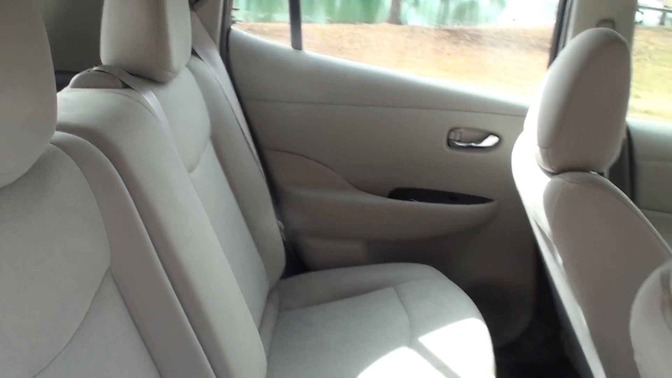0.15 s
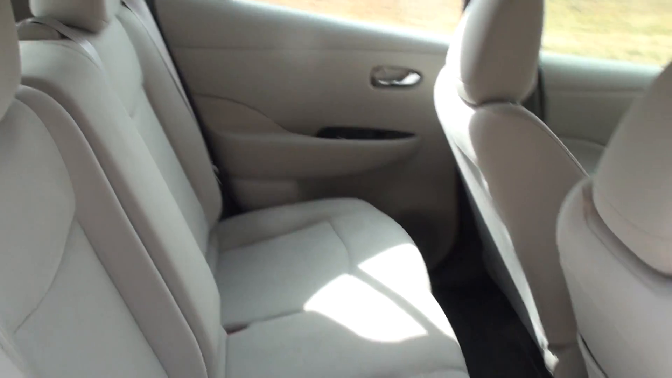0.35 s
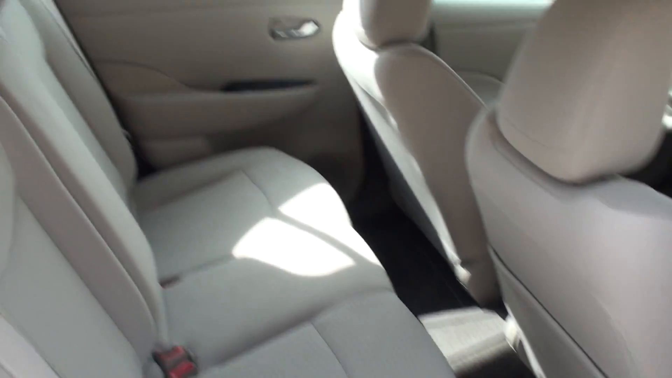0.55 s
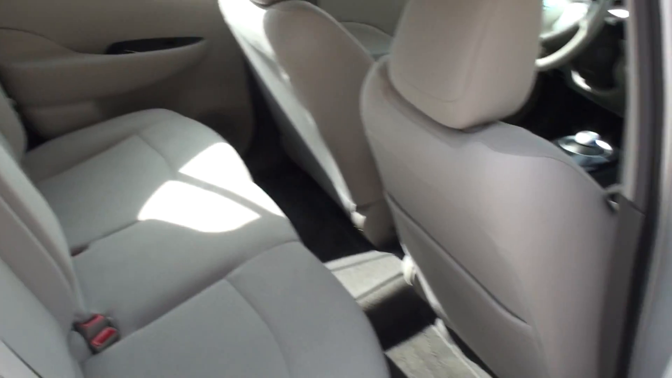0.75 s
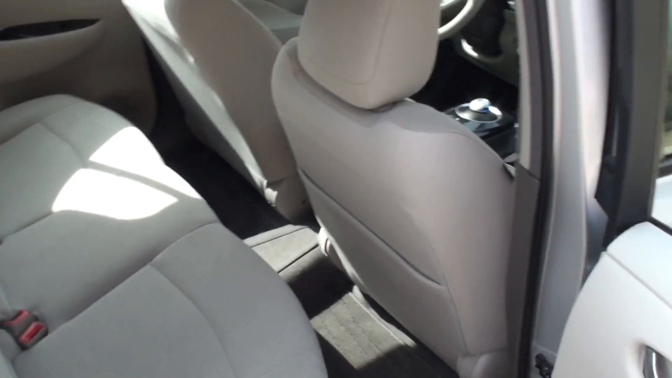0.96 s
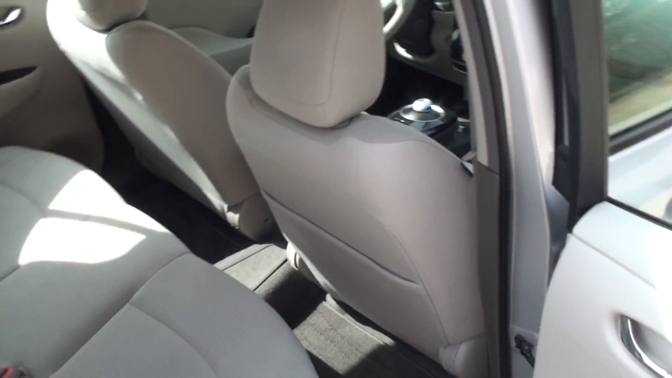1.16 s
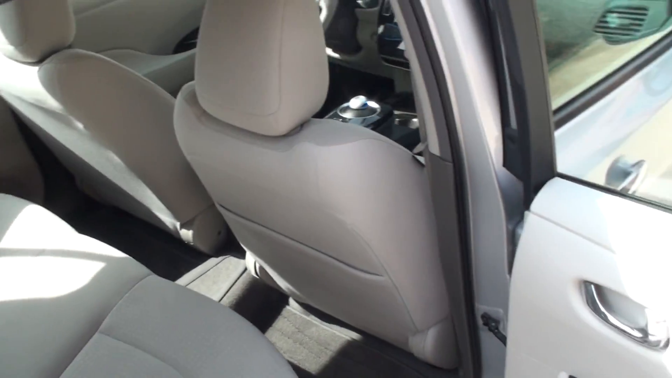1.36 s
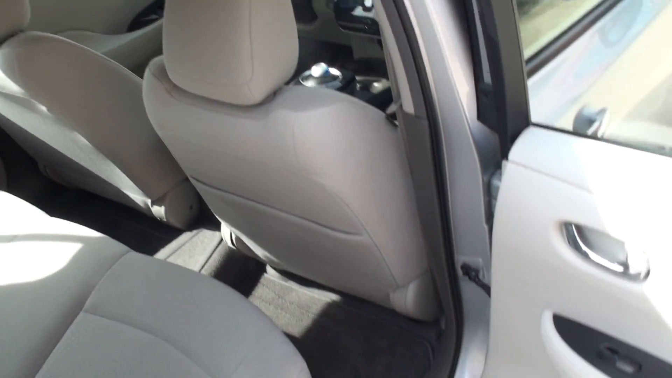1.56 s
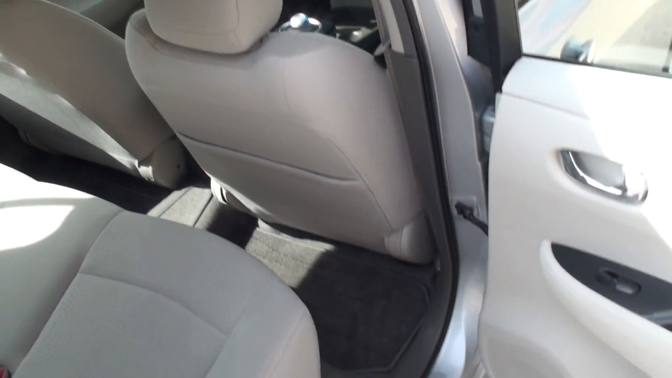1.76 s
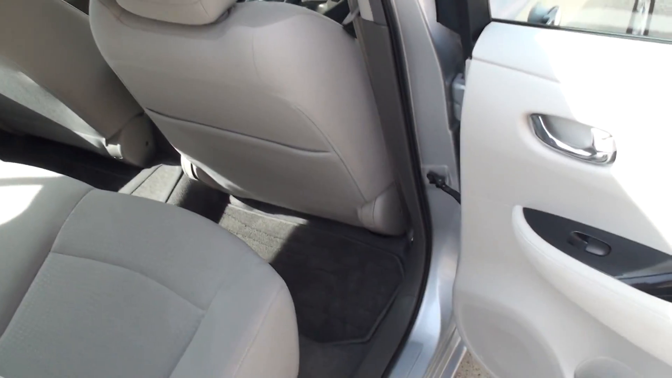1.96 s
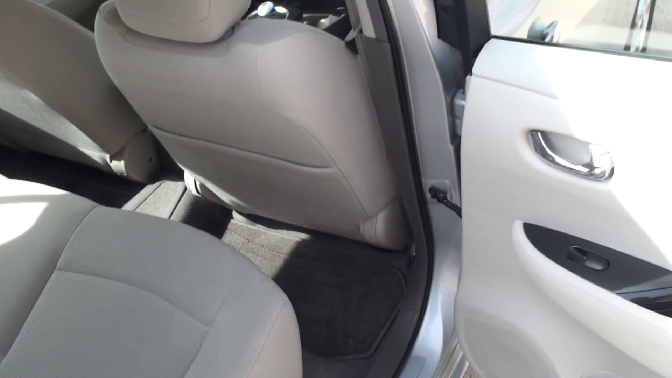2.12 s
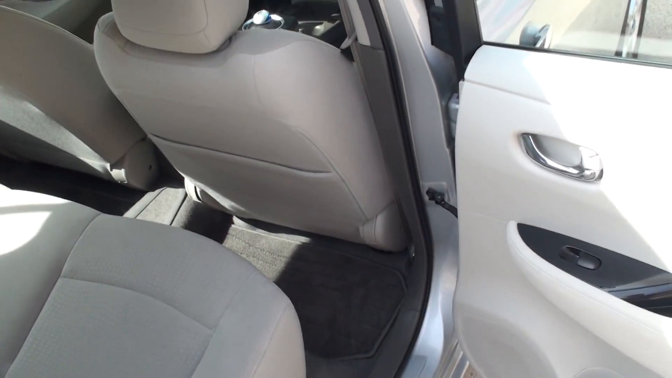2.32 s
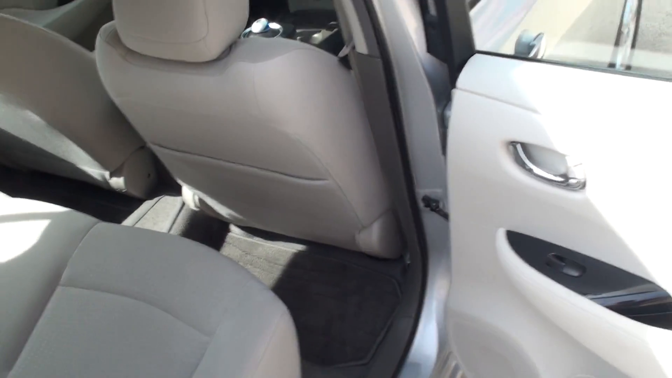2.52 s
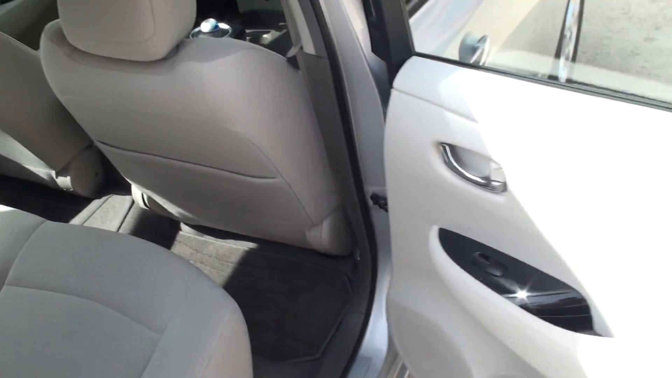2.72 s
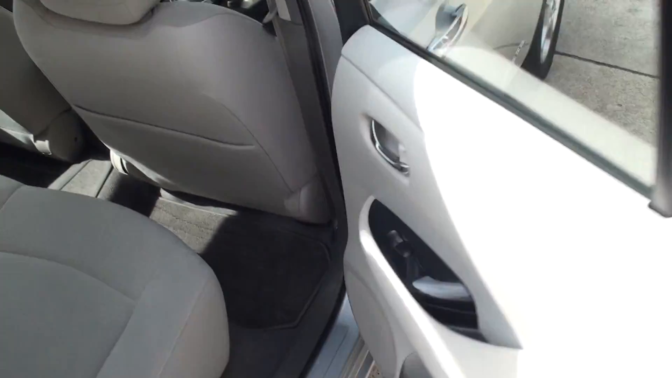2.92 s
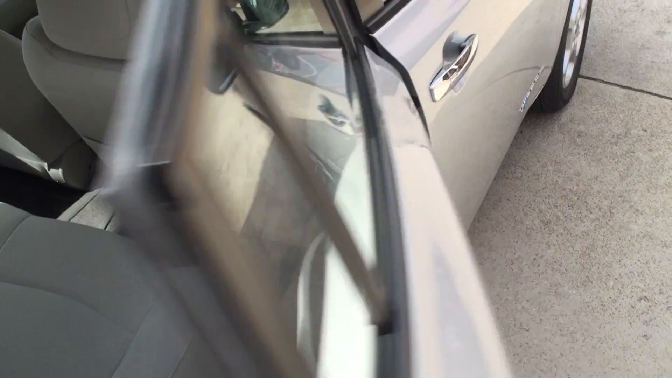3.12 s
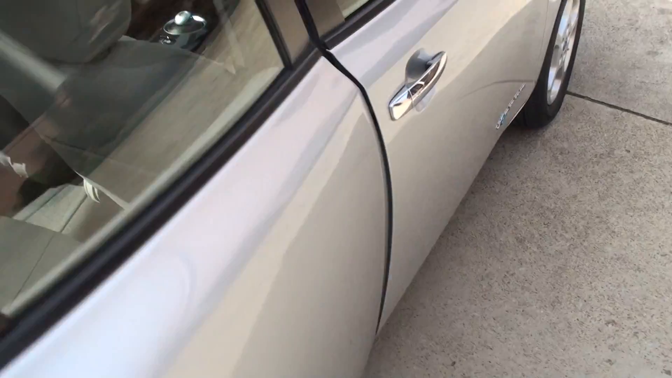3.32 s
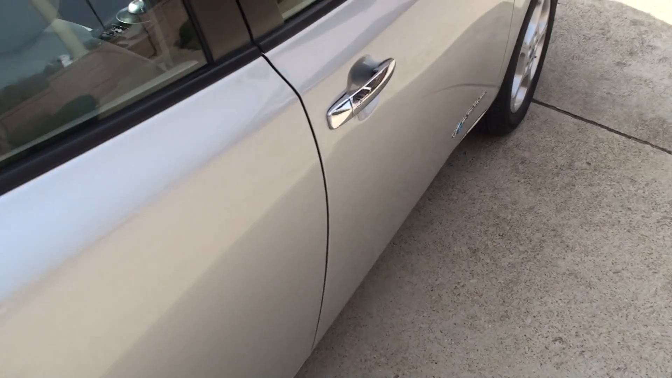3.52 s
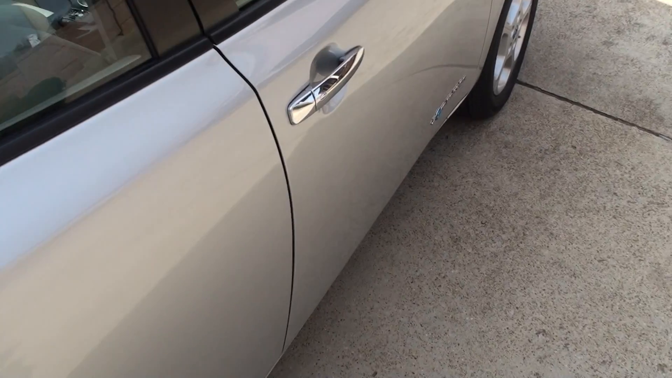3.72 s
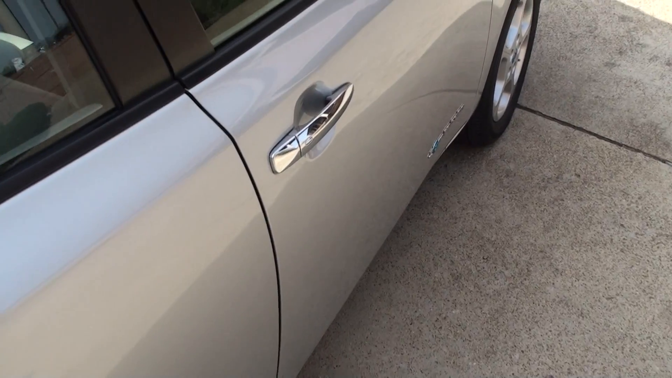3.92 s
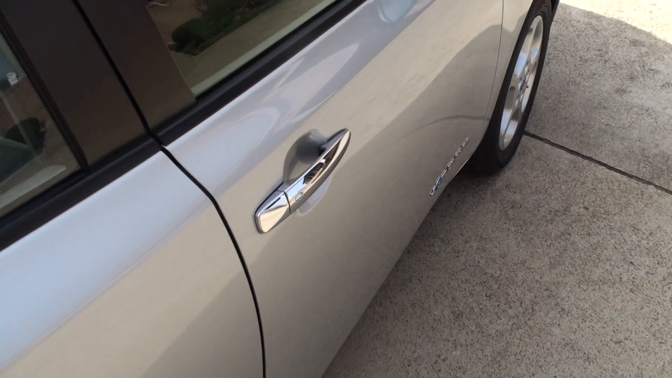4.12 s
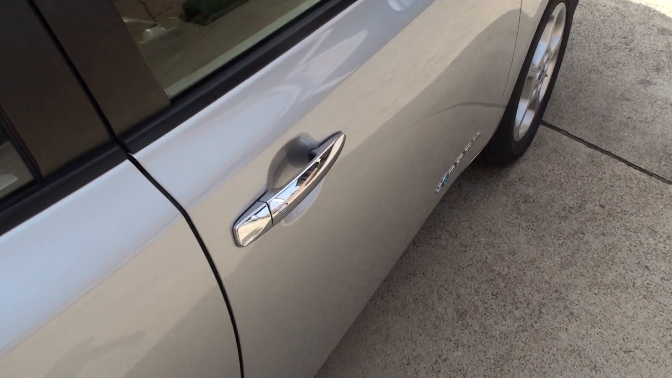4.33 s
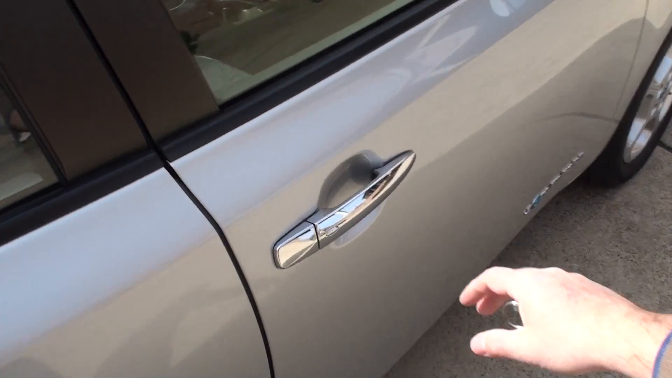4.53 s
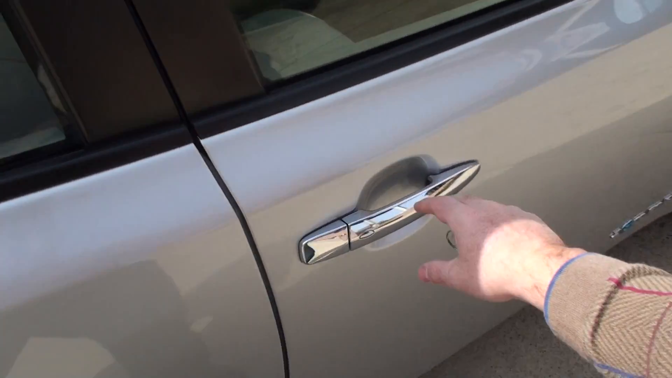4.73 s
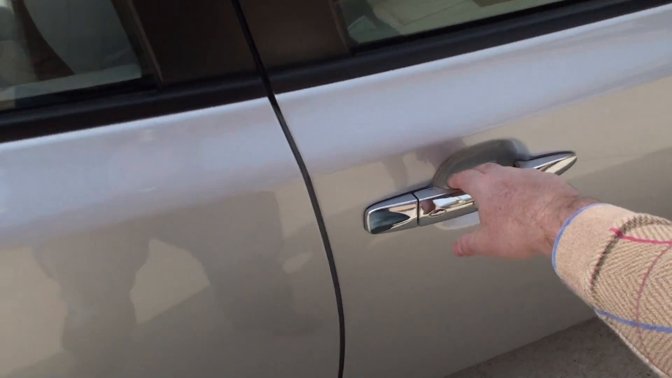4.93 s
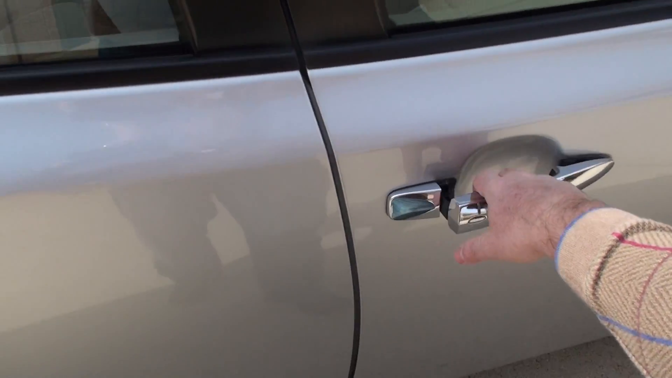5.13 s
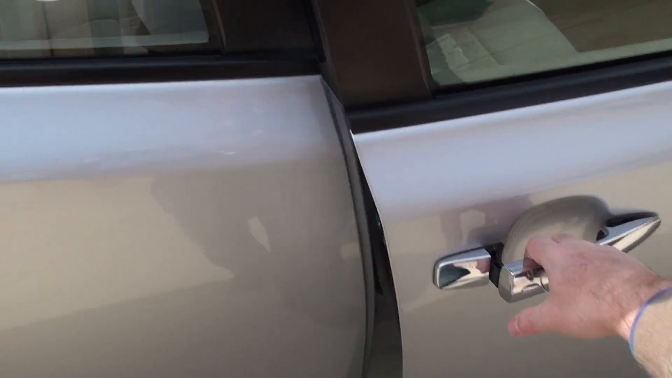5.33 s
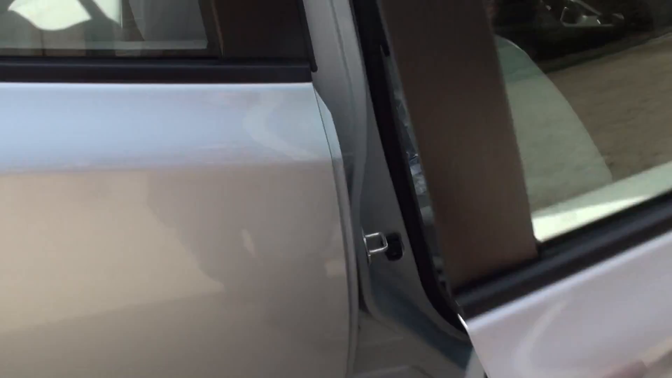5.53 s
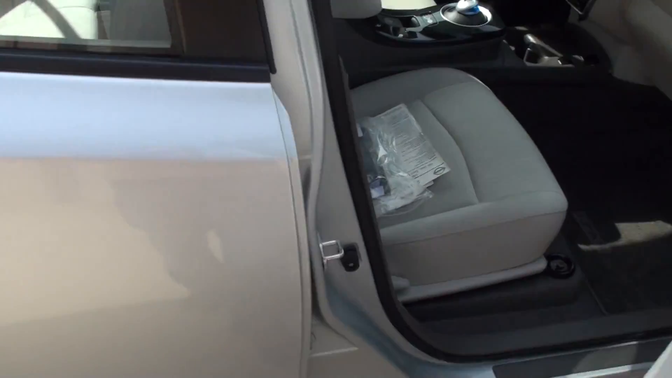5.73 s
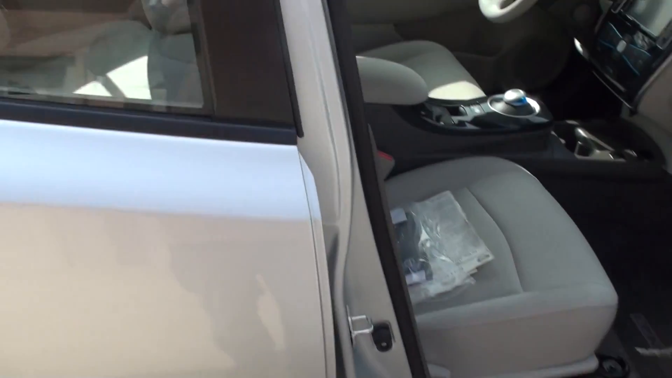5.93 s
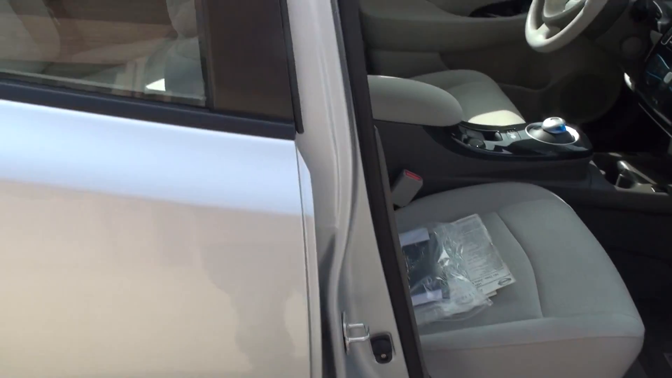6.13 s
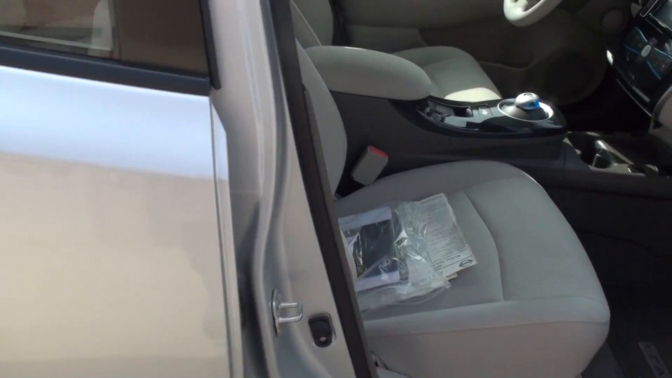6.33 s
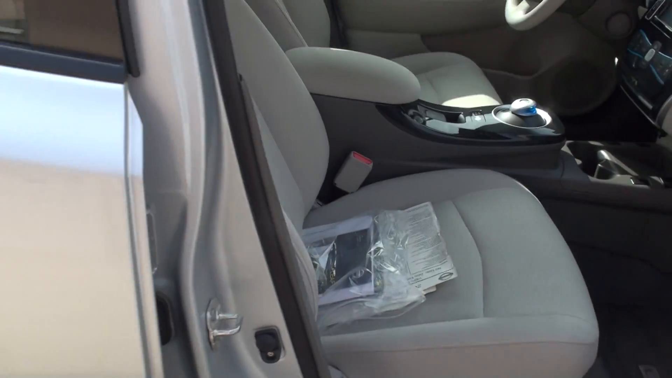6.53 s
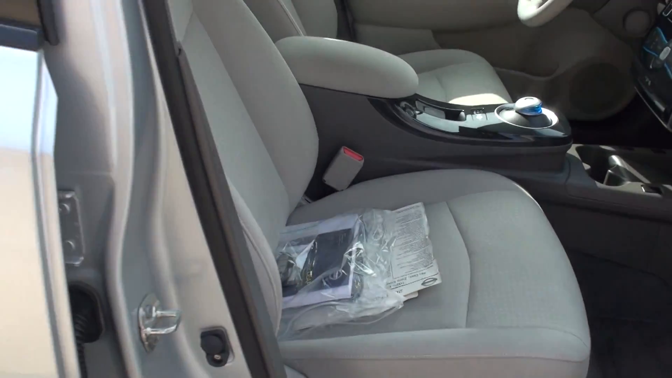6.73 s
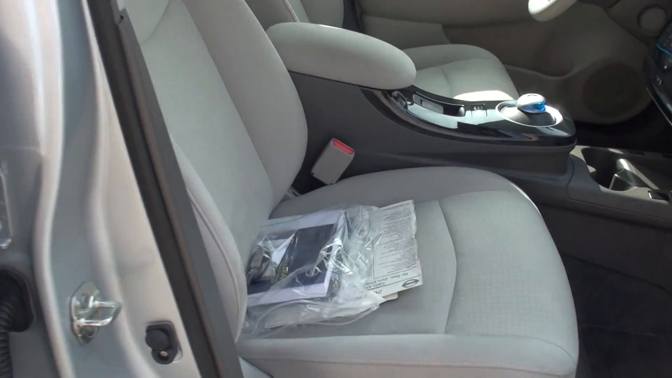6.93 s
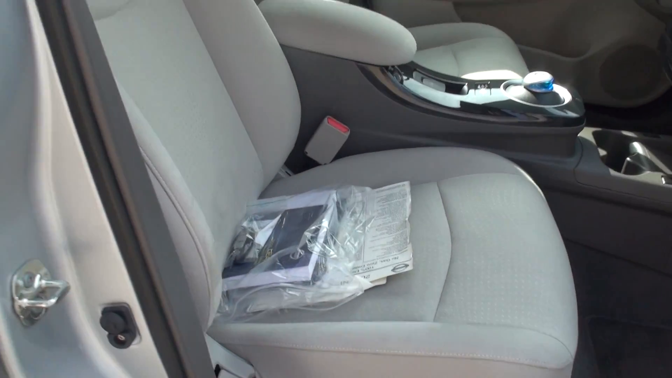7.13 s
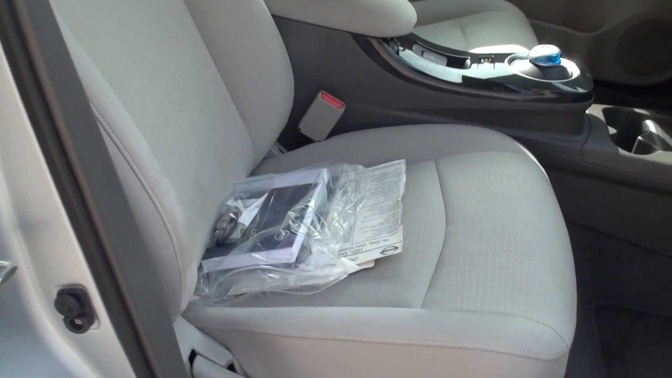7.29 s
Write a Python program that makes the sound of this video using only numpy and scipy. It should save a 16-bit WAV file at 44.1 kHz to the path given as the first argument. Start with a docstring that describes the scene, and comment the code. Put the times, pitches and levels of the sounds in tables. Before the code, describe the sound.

Close handheld stereo view beside a parked car outdoors. Quiet traffic rumble, breeze and steady hiss; small clicks and a few bird chips. A rear door slams with a sharp latch clack, deep hollow thunk and rumbling tail. After a pause, the front handle and latch clunk open, the door knocks at its stop, and small sharp ticks follow over a faint hinge drag.

```python
"""Two car doors outdoors

Beside a parked car, a rear door is pushed shut, then a front door is unlatched and swung to its stop.
Each blow rings sets of fading sine waves for latch steel, door skin and cabin air, with a noisy thud and crack.
Short noise bursts make the ticks, rustles and hinge drag; sliding sine tones make the birds and a far whistle.
Shaped noise makes the distant traffic, the breeze and an almost even hiss behind it all.
"""
import sys
import numpy as np
from scipy import signal
from scipy.fft import rfft, irfft, next_fast_len
from scipy.io import wavfile
from scipy.ndimage import uniform_filter1d

SR = 44100
rng = np.random.default_rng(int(sys.argv[2]) if len(sys.argv) > 2 else 0)


def generate_wav(signal):
    """Clip the signal to [-1, 1] and save it as 16-bit WAV at the path in sys.argv[1]."""
    frames = np.transpose(np.atleast_2d(signal))
    scaled = np.clip(frames, -1, 1) * 32767
    pcm = np.round(scaled).astype(np.int16)
    wavfile.write(sys.argv[1], SR, pcm)


N = 328986

# traffic and breeze swelling: time_s, rumble_db, tyre_roar_db
AIR_SWELLS = [(0.0, -58.5, -64), (0.6, -60.5, -66), (1.3, -59.5, -65), (2.0, -55, -65),
              (2.47, -58.5, -61.5), (2.99, -56.5, -60), (3.41, -52.5, -58.5), (3.95, -59.5, -62),
              (4.2, -60, -63.5), (4.61, -56.5, -63), (5.09, -56.5, -59.5), (5.4, -55, -58),
              (5.94, -53.5, -60.5), (6.34, -54.5, -59.5), (6.7, -55.5, -63), (7.15, -53, -62.5),
              (7.46, -51.5, -62)]
# bands in which rumble, roar and treble levels are set: low_hz, high_hz
AIR_BANDS = [(40, 160), (500, 1300), (2000, 6000)]
# shape of the air noise before the swells set its level: pitch_hz, density_db (per Hz)
AIR_SHAPE = [(12, -35), (20, -43), (37, -4), (53, -1), (108, 0), (139, -10), (258, -17.5), (690, -21),
             (750, -21), (863, -19.5), (1840, -29.5), (2240, -30.5), (3060, -34.5), (4660, -38),
             (16500, -49)]
# how alike left and right are in the air noise: pitch_hz, likeness (0 to 1)
AIR_LIKENESS = [(60, 0.99), (130, 0.99), (290, 0.8), (640, 0.63), (1410, 0.39), (3100, 0.14), (6820, 0.41),
                (15000, 0.9)]
# light ticks of handle, trim and clothing: start_s, level_db, knock_db, top_db, pitch_hz, left_minus_right_db
LIGHT_TICKS = [(0.037, -62, -66, -77, 3120, 4), (0.4616, -64.5, -51.5, -74, 3010, 4),
               (1.1896, -49.5, -60, -58, 4000, 0), (1.2487, -61, -58, -61, 3380, -0.5),
               (2.1844, -60, -63, -56, 4660, -0.5), (3.2094, -64, -63, -68, 6790, -1.5),
               (3.2275, -58, -61, -67, 7630, -2), (3.3127, -63, -58, -77, 5490, 0),
               (3.41, -49.5, -51, -57, 3220, 1.5), (3.937, -55, -55, -54, 3860, 0),
               (3.9474, -62, -58.5, -57, 4040, -1), (3.9723, -65, -56, -72, 3390, -7),
               (4.0104, -43.5, -54, -72, 3020, 3), (4.0237, -53, -62, -69, 3030, 6),
               (4.058, -55.5, -54, -52, 7350, 3), (4.302, -62, -58, -75, 2980, -2),
               (4.834, -62.5, -59, -74, 6980, -3), (5.0689, -56, -52.5, -73, 3680, -0.5),
               (5.0807, -57, -62, -72, 3710, -1.5), (5.1035, -62, -53, -66, 3040, 1),
               (5.334, -73, -59, -79, 3000, -1), (5.5658, -63, -66, -59, 5360, -2),
               (5.895, -54.5, -60, -68, 3080, -2), (5.9263, -51.5, -65, -57, 3130, -3),
               (6.137, -53, -50.5, -59, 3680, -7), (6.1964, -47, -41, -41, 3960, 4),
               (6.247, -34, -54, -37, 7140, -2), (6.262, -49, -53, -63, 6860, 4),
               (6.43, -64, -70, -80, 7550, 0), (6.4593, -51.5, -50, -75, 3020, -1),
               (6.508, -65, -70, -75, 7700, -6), (6.584, -47.5, -50, -70, 3470, -4),
               (6.849, -63.5, -55, -76, 3120, 4), (6.981, -60.5, -72, -78, 4750, 0.5),
               (7.3476, -55.5, -56, -78, 3320, 1)]
# cloth and seal rustles, hand and seal scuffs, levels before their grain:
# middle_s, length_s, level_db, pitch_hz, left_minus_right_db
SOFT_RUSTLES = [(.08, 0.035, -71, 3970, -3), (1.036, 0.034, -63, 1820, -1), (1.172, 0.048, -59, 3600, 1),
                (1.255, 0.028, -69, 3050, 0), (2.93, 0.079, -54, 397, 0), (3.6, 0.14, -61, 378, -4),
                (3.147, 0.035, -59, 7300, -1), (3.6, 0.076, -66, 10600, 2), (3.88, 0.027, -66, 3704, -2),
                (4.086, .08, -69.5, 5760, -2), (4.304, 0.016, -62.5, 2600, 2), (4.756, 0.047, -61, 4560, 0),
                (5.13, 0.072, -49, 450, 0), (5.205, 0.045, -62, 10500, -2), (5.28, 0.096, -50.5, 875, -2),
                (5.768, 0.062, -61.5, 5100, -2), (6.177, 0.022, -49.5, 6700, -4),
                (6.211, 0.042, -52.5, 6700, 5), (6.278, 0.11, -63, 6030, 0), (6.56, .05, -55.5, 444, -2)]
# bird chips: start_s, start_hz, end_hz, level_db
BIRD_CHIPS = [(.325, 6500, 7300, -68), (1.206, 5660, 8000, -57.5), (1.32, 7900, 5900, -73),
              (2.028, 6940, 7650, -72), (5.415, 5970, 8000, -57)]
# blows on doors and trim: start_s, latch_db, skin_db, cabin_db, crack_db, crack_top_db,
# favoured_skin_hz, crack_hz, left_minus_right_db
DOOR_BLOWS = [(1.031, -46, -49.5, -76, -55, -78, 388, 5000, 0.5),
              (1.145, -40, -44.5, -65, -53.5, -69, 340, 4960, 2),
              (1.168, -30, -58, -67, -43, -59, 517, 3600, 0.5),
              (2.159, -55, -63, -52, -53, -67, 151, 4650, 0),
              (2.882, -45, -43, -44, -48, -80, 336, 3360, 0),
              (2.906, -46, -37.5, -42.5, -49.5, -81, 330, 3370, -1),
              (3.079, -52, -40.5, -45, -54, -77, 206, 3120, 1),
              (3.521, -11, -27.5, -32.5, -33, -67, 579, 3370, 9),
              (3.537, -19.5, -19.5, -24, -30.5, -43, 482, 3260, 4.5),
              (3.551, -28, -22, -34, -44, -61, 215, 3000, 12),
              (3.564, -34.5, -12.5, -22.5, -31.5, -43, 210, 3300, 3.5),
              (3.583, -30, -42, -18.5, -39.5, -67, 261, 3000, 0),
              (3.602, -26, -16, -22, -37, -57, 192, 3170, 4.5),
              (3.617, -36, -47, -40, -41, -68, 175, 3000, -2),
              (3.644, -52, -32, -36, -49, -74, 226, 3000, -10),
              (3.857, -47, -53.5, -52, -61, -83, 412, 3500, -12),
              (4.494, -54, -46.5, -63, -61, -79, 183, 3220, -1),
              (5.118, -47, -37, -54, -47.5, -58, 455, 4000, -4),
              (5.138, -32.5, -30.5, -42, -39.5, -42.5, 194, 3480, 0),
              (5.177, -33.5, -26.5, -36, -44, -62, 310, 4750, 3),
              (5.184, -26, -17.5, -29, -44, -54, 362, 3570, 1.5),
              (5.193, -12, -16.5, -33, -26.5, -35.5, 346, 5000, -0.5),
              (5.203, -22.5, -22.5, -43, -34, -59, 360, 3050, -2),
              (5.22, -35, -34, -58, -51, -62, 280, 5010, 7),
              (5.27, -38, -41, -41, -46.5, -61, 205, 3060, -2),
              (5.74, -49, -41, -58, -53, -71, 238, 6700, -0.5),
              (5.784, -40, -49, -43, -44.5, -66, 290, 2500, -1.5),
              (5.803, -23.5, -17.5, -30, -22.5, -36.5, 423, 4900, -1.5),
              (5.818, -22.5, -21.5, -32.5, -57, -64, 205, 3120, -1),
              (5.834, -40, -27.5, -56, -62, -76, 557, 3070, -1),
              (6.189, -38, -38.5, -40, -25, -57, 337, 7100, -6.5),
              (6.235, -48, -57, -49, -27.5, -48, 342, 8400, -8),
              (6.548, -50, -47.5, -60, -63, -72, 260, 3410, -1),
              (7.41, -53, -57, -51, -66, -80, 246, 3250, 3)]
# ringing of the cabin air, before each blow varies it: pitch_hz, level_db, t60_s (time to fade by 60 dB)
CABIN_MODES = [(26.7, 0.5, 0.42), (59.4, -4.5, 0.23), (104.8, -4, 0.33), (127.5, 3, 0.24)]
# ringing of the door skin, likewise: pitch_hz, level_db, t60_s
SKIN_MODES = [(182, 4, 0.093), (215, -4, 0.22), (241.3, -4.5, 0.17), (275.7, -5, 0.22), (305.7, 1, 0.14),
              (369.8, 3.5, 0.12), (427, -2.5, 0.14), (475, -0.5, 0.12), (519, -13, 0.19), (568, -2, 0.15)]
# ringing of the latch steel, likewise: pitch_hz, level_db, t60_s
LATCH_MODES = [(652, -0.5, 0.071), (744, 0.5, 0.056), (827.5, -3.5, 0.095), (930.5, 4, 0.065),
               (1107, -17, 0.15), (1150, -3.5, 0.049), (1340, -0.5, 0.054), (1480, -7.5, 0.077),
               (1575, 3.5, 0.043), (1827, -4, 0.044), (2158, -10, 0.021)]
# resonances of the dragging hinge, before they waver: pitch_hz, width_hz, level_db
HINGE_RESONANCES = [(2130, 180, 2), (2640, 90, -1), (3500, 220, -3)]

TREBLE_DB, TREBLE_FOLLOWS = -71, 0.35  # the treble moves by this share of the tyre roar's swell
WHINE_HZ, WHINE_OCTAVES = 916, 0.081  # a narrow whine within the tyre roar
WHINE_DB, WHINE_SWELL_DB = -12.5, 7.5  # relative to the tyre roar; it comes and goes
TICK_T60_S = 0.031  # of a tick's ring; its other parts fade faster or slower
CHIP_S, CHIP_ECHO_DB, CHIP_ECHO_T60_S = 0.028, -7.5, 0.57
# a thin far whistle that wavers (share of its pitch) and dies away
WHISTLE_S, WHISTLE_LENGTH_S, WHISTLE_HZ, WHISTLE_DB = 6.89, 0.37, 2320, -65
WHISTLE_FALL_DB_PER_S, WHISTLE_WAVER = -33, 0.03
# contact time at a latch level of -24.5 dB, and its change per dB; lighter blows land softer
CONTACT_S, CONTACT_S_PER_DB = 0.003, -0.0001
LATCH_FAVOURED_HZ, CABIN_FAVOURED_HZ = 815, 63.5
FRONT_DOOR_S, FRONT_CABIN_HZ = 5, 124  # from here on the front door sounds; unsealed, it booms higher
TWIN_DB = -5  # the second mode of each close pair
THUD_T60_S, THUD_DB = 0.28, -18  # relative to the louder of skin and latch
CRACK_T60_S = 0.027  # of the slower of its two fades
CRACK_TAIL_T60_S, CRACK_TAIL_DB, CRACK_TAIL_GRAIN_DB = 0.11, -8.5, 1.5  # relative to the crack
# the whole car rumbles on after the slam
SLAM_S, SHUDDER_DB, SHUDDER_HZ, SHUDDER_RISE_S, SHUDDER_T60_S = 3.53, -35, 110, 0.044, 0.78
HINGE_S, HINGE_LENGTH_S, HINGE_DB = 6.2, 0.49, -68.5  # the middle of the drag, its length and level
BODY_TOP_HZ = 8860  # snaps and cracks carry little between here and their thin top band
MIC_EDGE_HZ, MIC_ABOVE_DB = 13400, -10
TOP_HZ = 16400


def undb(db):
    """Turn decibels into a plain loudness factor."""
    return 10 ** (np.asarray(db) / 20)


def fade(t, t60):
    """Die away smoothly, by 60 dB in t60 seconds."""
    return np.exp(-np.log(1000) * t / t60)


def add(out, s, sound, pan_db):
    """Mix a sound in at s seconds; pan_db is how much louder the left is than the right."""
    i = int(s * SR)
    start, end = max(i, 0), min(i + sound.shape[-1], N)
    sides = undb(np.array([[pan_db], [-pan_db]]) / 2)
    out[:, start:end] += sound[..., start - i:end - i] * sides


def hiss(n, hz, octaves, apart, top_hz=np.inf):
    """Two-channel noise in a bell-shaped band, rms 1; apart = share that differs left and right."""
    f = np.maximum(np.arange(n // 2 + 1) * SR / n, 1)
    bell = np.exp(-0.5 * (np.log2(f / hz) / octaves) ** 2)
    bell = bell / np.sqrt(1 + (f / top_hz) ** 14)
    mid, side = irfft(rfft(rng.standard_normal((2, n))) * bell, n)
    share = np.clip(apart, 0, 0.5)
    pair = np.sqrt(1 - share) * mid + np.sqrt(share) * side * np.array([[1], [-1]])
    return pair / pair.std()


def walk(rate):
    """Random levels held for 1 / rate seconds, then smoothed twice into a wandering curve."""
    k = int(SR / rate)
    steps = np.repeat(rng.standard_normal(N // k + 1), k)
    return 0.73 * uniform_filter1d(uniform_filter1d(steps, k), k)[:N]


def air():
    """Traffic and breeze: noise bands follow three swells and flicker a little; the top hiss has no swell."""
    n = next_fast_len(N)
    octave = np.log2(np.maximum(np.arange(n // 2 + 1) * SR / n, 1))
    shape_hz, shape_db = np.transpose(AIR_SHAPE)
    colour = undb(np.interp(octave, np.log2(shape_hz), shape_db))
    alike_hz, likeness = np.transpose(AIR_LIKENESS)
    alike = np.clip(np.interp(octave, np.log2(alike_hz), likeness), 0, 1)
    shares = np.sqrt([(1 + alike) / 2, (1 - alike) / 2])
    mid, side = rfft(rng.standard_normal((2, n))) * colour * shares

    s, rumble_db, roar_db = np.transpose(AIR_SWELLS)
    treble_db = TREBLE_DB + TREBLE_FOLLOWS * (roar_db - roar_db.mean())
    # gain that brings each band of the noise to its level
    gains = []
    for (lo, hi), db in zip(AIR_BANDS, (rumble_db, roar_db, treble_db)):
        inside = (octave > np.log2(lo)) & (octave < np.log2(hi))
        power_db = 10 * np.log10(2 * np.sum(np.abs(mid[inside]) ** 2) / n ** 2)
        gains.append(db - power_db)
    # the top hiss takes the mean treble gain
    gains = np.array(gains + [np.full(len(s), gains[-1].mean())])
    places = np.log2([90, 800, 3500, 11000])  # where rumble, roar, treble and hiss gains apply

    t = np.arange(N) / SR
    whine_db = np.interp(t, s, roar_db) + WHINE_DB + WHINE_SWELL_DB * walk(3.12)
    out = hiss(n, WHINE_HZ, WHINE_OCTAVES, apart=0.09)[:, :N] * undb(whine_db)
    # overlapping bands, half an octave from one to the next
    for centre in np.arange(4, 15, 0.5):
        mask = np.clip(1 - 2 * np.abs(octave - centre), 0, 1)
        db = np.array([np.interp(centre, places, g) for g in gains.T])
        flicker_db = np.interp(centre, [5, 13], [1.8, 0.4]) * walk(6.4)
        pair = irfft(np.array([mid + side, mid - side]) * mask, n)[:, :N]
        out = out + pair * undb(np.interp(t, s, db) + flicker_db)
    return out


def ticks():
    """Each tick: a broad snap, a narrower ring at its own pitch, a dull knock below and a thin top."""
    out, t = np.zeros((2, N)), np.arange(4096) / SR
    for s, db, knock_db, top_db, hz, pan_db in LIGHT_TICKS:
        snap = fade(t, 0.7 * TICK_T60_S) * hiss(len(t), 5200, 1.0, apart=0.091, top_hz=BODY_TOP_HZ)
        tone = fade(t, TICK_T60_S) * hiss(len(t), hz, 0.28, apart=0.05)
        knock = fade(t, 2.2 * TICK_T60_S) * hiss(len(t), 1190, 0.61, apart=0.1)
        top = fade(t, 0.52 * TICK_T60_S) * hiss(len(t), 12200, 0.19, apart=0.02)
        add(out, s, undb(db) * (snap + 0.99 * tone) + undb(knock_db) * knock, pan_db)
        add(out, s, undb(top_db) * top, 0.4 * pan_db)
    return out


def rustles():
    """Cloth, hands and seals rubbing: short swells of noise with a grainy, uneven level."""
    out, t = np.zeros((2, N)), np.arange(-8192, 8192) / SR
    grain = undb(4.2 * walk(200))
    for s, length, db, hz, pan_db in SOFT_RUSTLES:
        swell = np.exp(-0.5 * (2 * t / length) ** 2)
        noise = hiss(len(t), hz, 1.0, apart=0.089, top_hz=1.43 * hz)
        add(out, s + t[0], undb(db) * swell * noise, pan_db)
    return out * grain


def birds():
    """Quick sliding chips that level off and echo faintly, and one long thin whistle."""
    out, t = np.zeros((2, N)), np.arange(16384) / SR
    for s, start_hz, end_hz, db in BIRD_CHIPS:
        hz = end_hz + (start_hz - end_hz) * np.exp(-4 * t / CHIP_S)
        swell = np.sin(np.pi * np.minimum(t / CHIP_S, 1))
        chip = swell * np.sin(2 * np.pi * np.cumsum(hz) / SR)
        # the echo is narrow noise near the chip's final pitch
        echo_shape = undb(CHIP_ECHO_DB) * (1 - np.exp(-t / CHIP_S)) * fade(t, CHIP_ECHO_T60_S)
        echo = echo_shape * hiss(len(t), 0.946 * end_hz, 0.068, apart=0.21)
        add(out, s, undb(db) * (chip + echo), 0)
    edges = np.clip(np.minimum(t, WHISTLE_LENGTH_S - t) / 0.013, 0, 1)
    hz = WHISTLE_HZ * (1 + WHISTLE_WAVER * walk(29.3)[:len(t)])
    whistle = np.sin(2 * np.pi * np.cumsum(hz) / SR)
    add(out, WHISTLE_S, edges * undb(WHISTLE_DB + WHISTLE_FALL_DB_PER_S * t) * whistle, 0)
    return out


def ring(modes, favoured_hz, rise_s, scatter_db, apart_rad, favour_db):
    """Strike fading modes in close pairs, peak 1; pitches off the favoured one change by favour_db per octave."""
    t = np.arange(int(0.4 * SR)) / SR
    hz, db, t60 = np.repeat(np.transpose(modes), 2, axis=1)[:, :, None]
    # each blow lands elsewhere, so shares and phases are new
    share, detune, turn, lean = rng.standard_normal((4, len(hz), 1))
    db = db + scatter_db * share + favour_db * np.abs(np.log2(hz / favoured_hz))
    db[1::2] += TWIN_DB
    size = undb(db) * fade(t, t60)
    phase = 2 * np.pi * hz * (1 + 0.022 * detune) * t + 2 * turn
    turning = np.exp(1j * phase) * size
    # opposite phase shifts left and right spread the sound
    lean = np.exp(1j * apart_rad * lean)
    pair = np.array([lean[:, 0] @ turning, lean[:, 0].conj() @ turning]).imag
    pair = pair * (1 - np.exp(-t / max(rise_s, 1e-4)))
    return pair / np.abs(pair.mean(axis=0)).max()


def blows():
    """The latch steel speaks first; skin and cabin air answer later and build up more slowly."""
    out, t = np.zeros((2, N)), np.arange(12288) / SR
    grain_db = np.tile(CRACK_TAIL_GRAIN_DB * walk(200), 2)
    for s, latch_db, skin_db, cabin_db, crack_db, top_db, skin_hz, crack_hz, pan_db in DOOR_BLOWS:
        cabin_hz = FRONT_CABIN_HZ if s > FRONT_DOOR_S else CABIN_FAVOURED_HZ
        contact = max(CONTACT_S + CONTACT_S_PER_DB * (latch_db + 24.5), 5e-4)
        latch = ring(LATCH_MODES, LATCH_FAVOURED_HZ, 0.22 * contact,
                     scatter_db=3.0, apart_rad=0.19, favour_db=-6.0)
        skin = ring(SKIN_MODES, skin_hz, 0.39 * contact, scatter_db=1.2, apart_rad=0.12, favour_db=-7)
        cabin = ring(CABIN_MODES, cabin_hz, 1.1 * contact, scatter_db=1.0, apart_rad=0.2, favour_db=-4.5)
        add(out, s, undb(latch_db) * latch, pan_db)
        add(out, s + 0.575 * contact, undb(skin_db) * skin, pan_db)
        add(out, s + 0.73 * contact, undb(cabin_db) * cabin, 0)

        # too many panel modes to count: a dull noisy thud that swells and dies
        thud_shape = (1 - np.exp(-t / 0.003)) * fade(t, THUD_T60_S)
        thud = thud_shape * hiss(len(t), 390, 1.31, apart=0.16)
        add(out, s, undb(max(skin_db, latch_db) + THUD_DB) * thud, pan_db)

        # a softer contact cracks more gradually
        rise = 1 - np.exp(-t / (0.35 * contact))
        burst = rise * (fade(t, CRACK_T60_S) + 0.84 * fade(t, 0.14 * CRACK_T60_S))
        crack = burst * hiss(len(t), crack_hz, 0.53, apart=0.038, top_hz=BODY_TOP_HZ)
        # loose parts and the ground add a duller, grainy tail
        tail_level = undb(CRACK_TAIL_DB + grain_db[int(s * SR):][:len(t)])
        tail_shape = tail_level * rise * fade(t, CRACK_TAIL_T60_S)
        tail = tail_shape * hiss(len(t), 2200, 1.14, apart=0.045)
        add(out, s, undb(crack_db) * (crack + tail), pan_db)
        top = burst * hiss(len(t), 11200, 0.32, apart=0.031)
        add(out, s, undb(top_db) * top, 0.5 * pan_db)

    t = np.arange(32768) / SR
    shudder_shape = (1 - np.exp(-t / SHUDDER_RISE_S)) * fade(t, SHUDDER_T60_S)
    shudder = shudder_shape * hiss(len(t), SHUDDER_HZ, 1.3, apart=0.14)
    add(out, SLAM_S, undb(SHUDDER_DB) * shudder, 1.5)
    return out


def hinge():
    """Dry friction as the door swings: uneven noise in a few resonances, swelling and sinking again."""
    out, t = np.zeros((2, N)), np.arange(-16384, 16384) / SR
    drag = 1.9 * hiss(len(t), 2160, 0.35, apart=0.11)
    for hz, width, db in HINGE_RESONANCES:
        level = undb(db + 3.1 * walk(14.4)[:len(t)])
        drag = drag + level * hiss(len(t), hz, 0.6 * width / hz, apart=0.1)
    swell = np.exp(-(2 * t / HINGE_LENGTH_S) ** 4)
    add(out, HINGE_S + t[0], undb(HINGE_DB) * swell * drag, -2)
    return out


def scene():
    """Mix the near sounds, dull them as the microphone does, and lay them over the air."""
    near = ticks() + rustles() + birds() + blows() + hinge()
    # the microphone dulls above its edge; the hiss within air() is not touched
    edge = signal.butter(10, MIC_EDGE_HZ, fs=SR, output="sos")
    below = signal.sosfiltfilt(edge, near)
    return below + undb(MIC_ABOVE_DB) * (near - below) + air()


def record(dry):
    """Cut the highest treble steeply."""
    return signal.sosfilt(signal.ellip(8, 0.2, 70, TOP_HZ, fs=SR, output="sos"), dry)


dry = scene()
out = record(dry)
generate_wav(out)
```